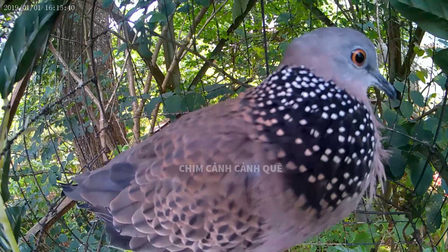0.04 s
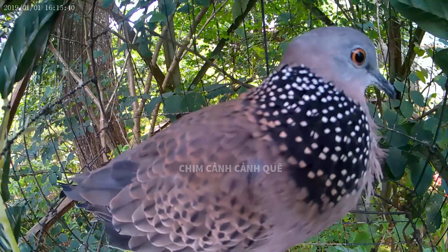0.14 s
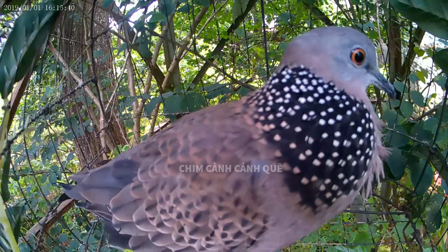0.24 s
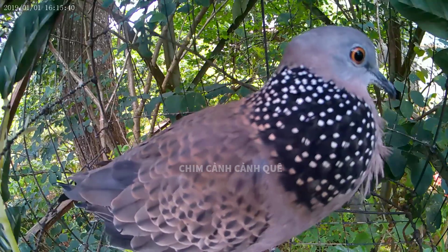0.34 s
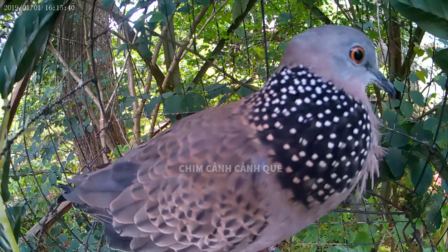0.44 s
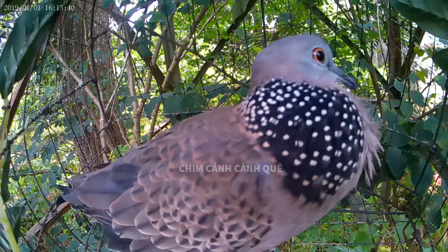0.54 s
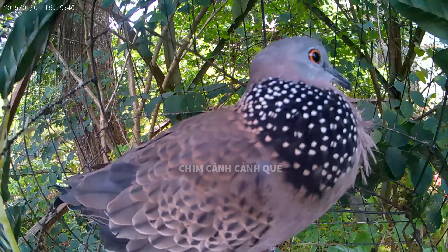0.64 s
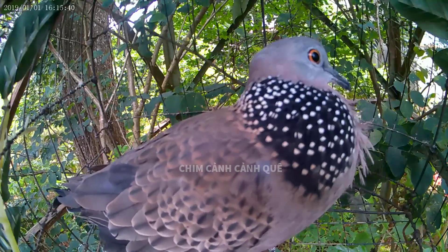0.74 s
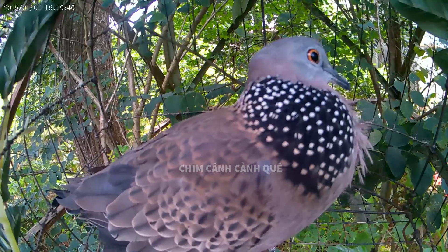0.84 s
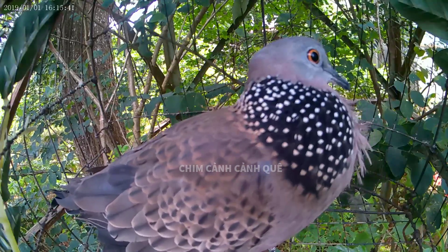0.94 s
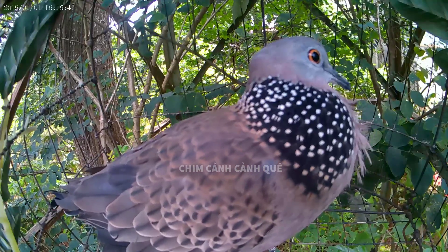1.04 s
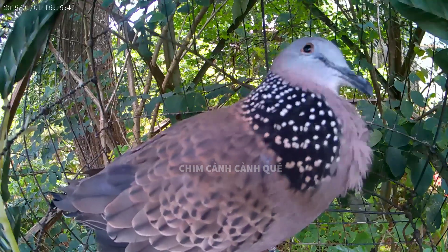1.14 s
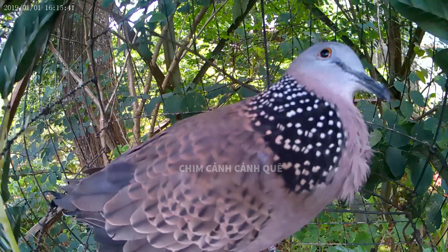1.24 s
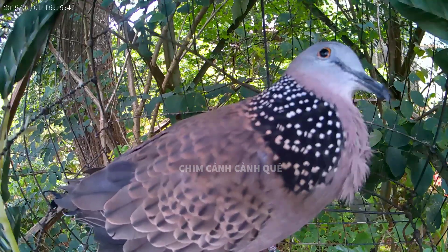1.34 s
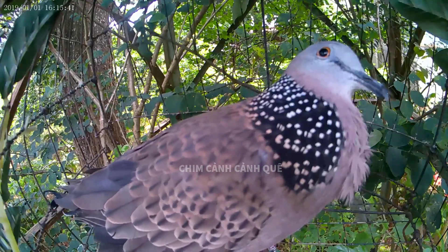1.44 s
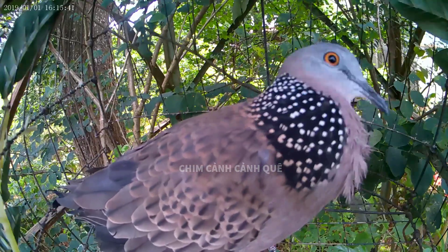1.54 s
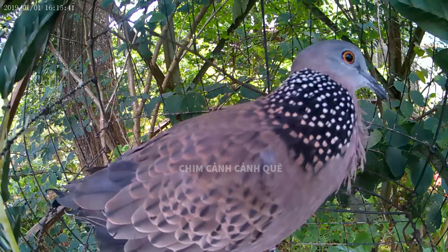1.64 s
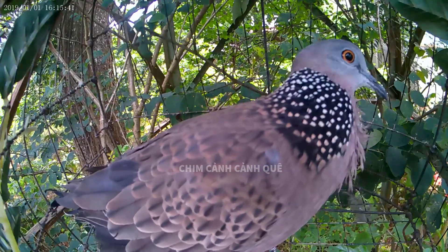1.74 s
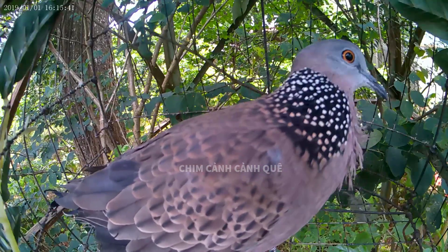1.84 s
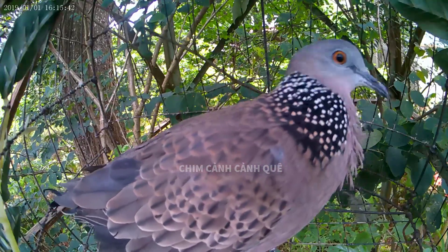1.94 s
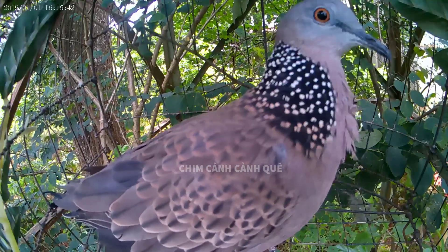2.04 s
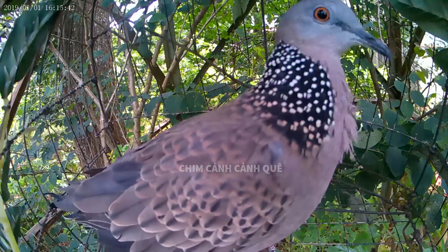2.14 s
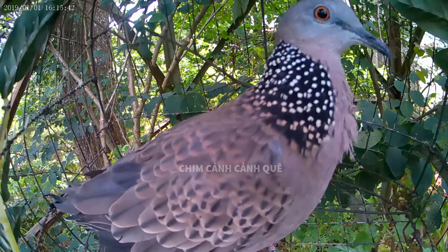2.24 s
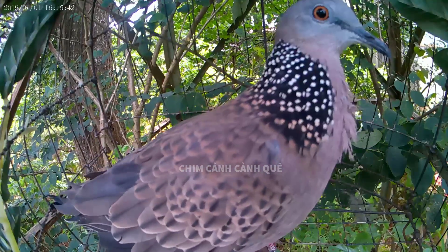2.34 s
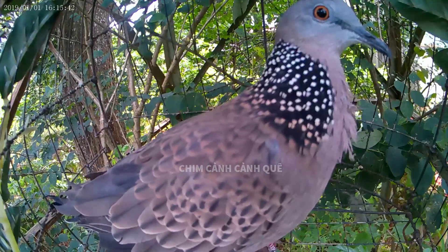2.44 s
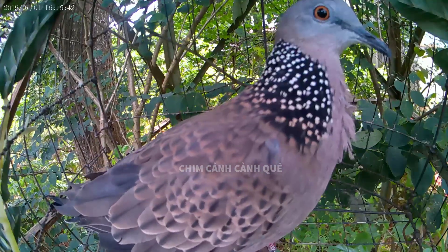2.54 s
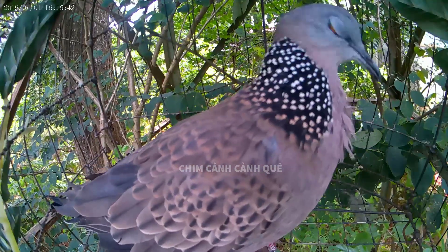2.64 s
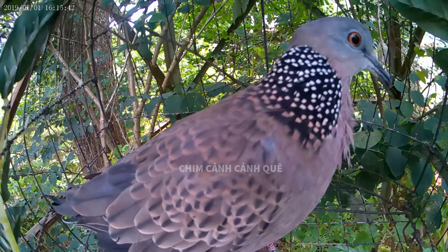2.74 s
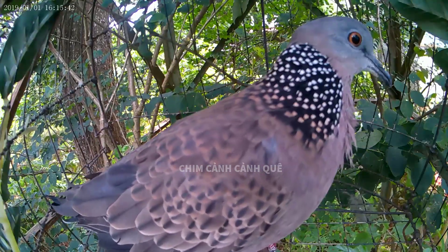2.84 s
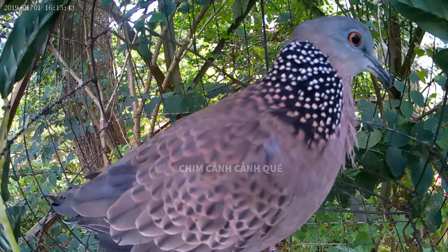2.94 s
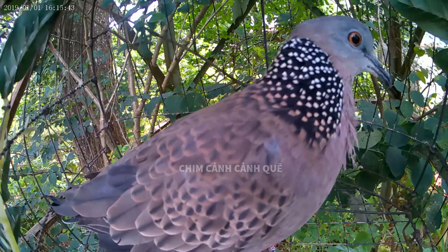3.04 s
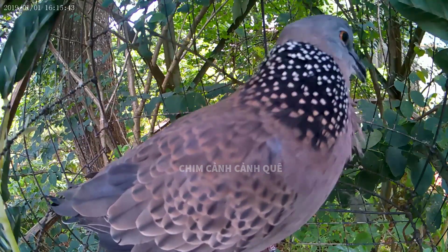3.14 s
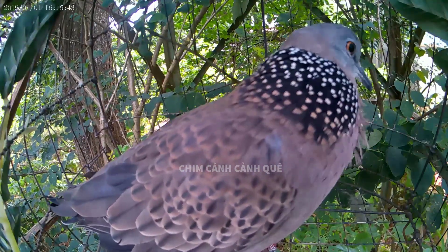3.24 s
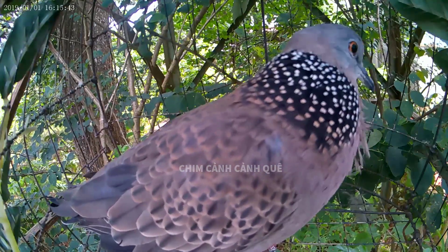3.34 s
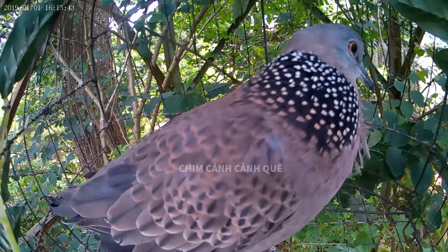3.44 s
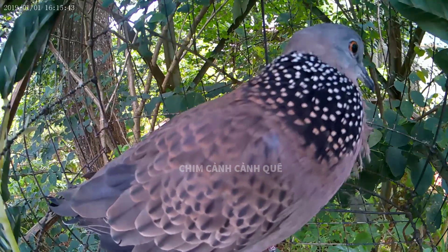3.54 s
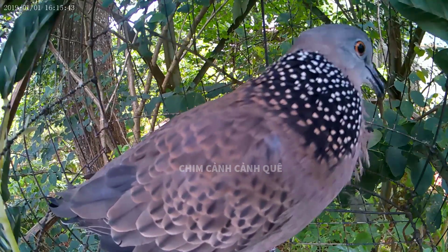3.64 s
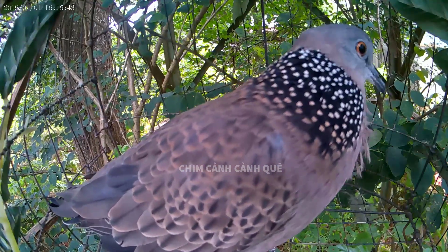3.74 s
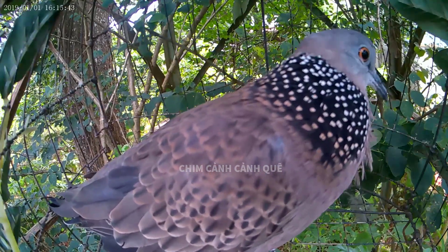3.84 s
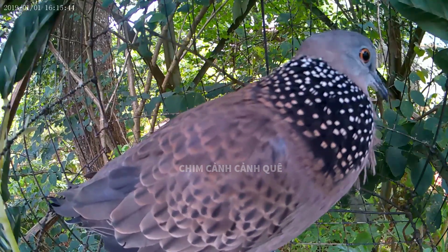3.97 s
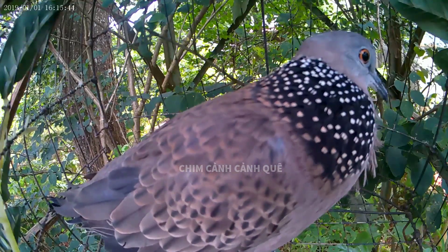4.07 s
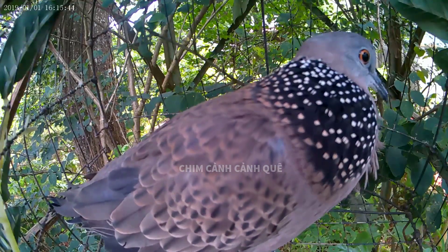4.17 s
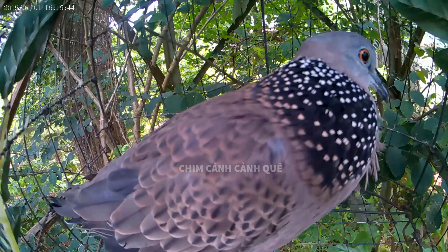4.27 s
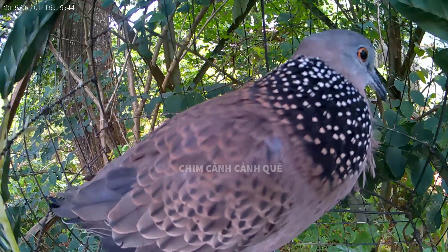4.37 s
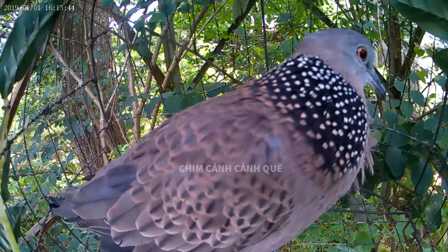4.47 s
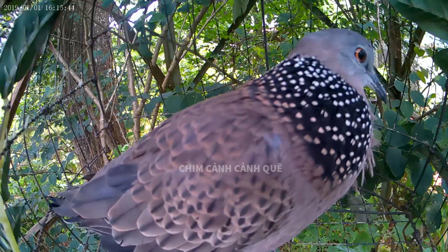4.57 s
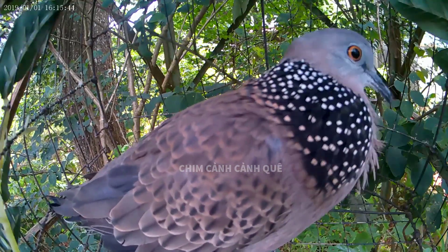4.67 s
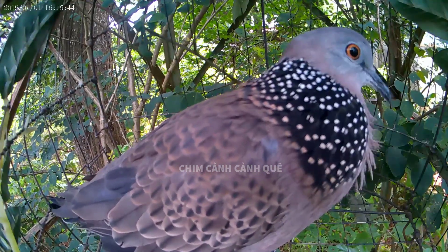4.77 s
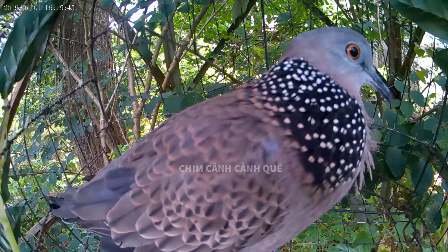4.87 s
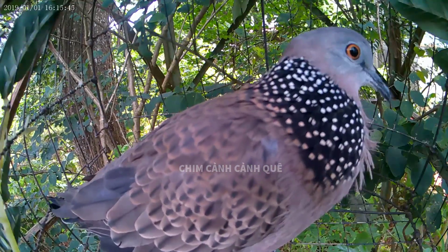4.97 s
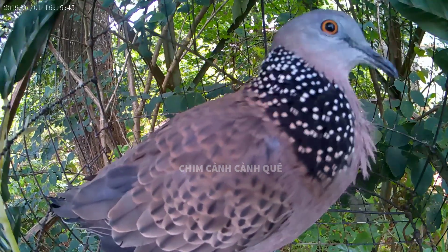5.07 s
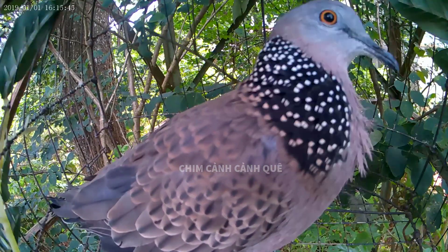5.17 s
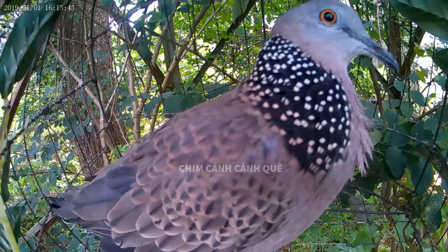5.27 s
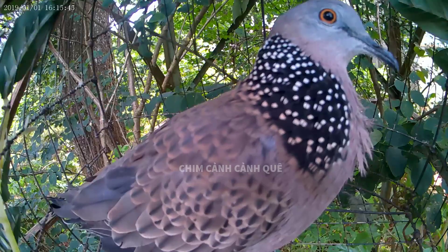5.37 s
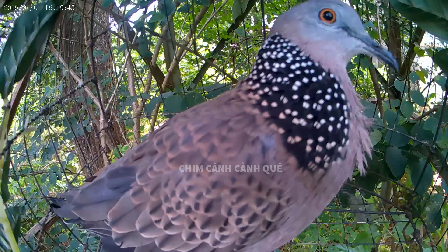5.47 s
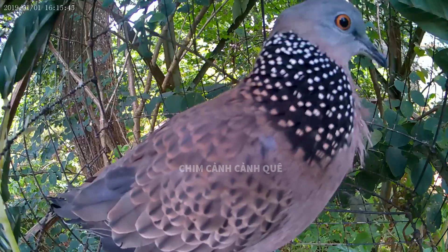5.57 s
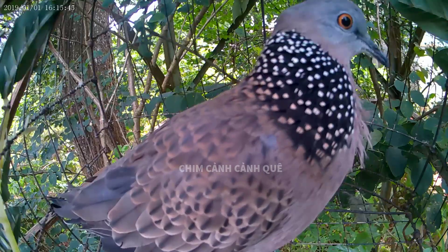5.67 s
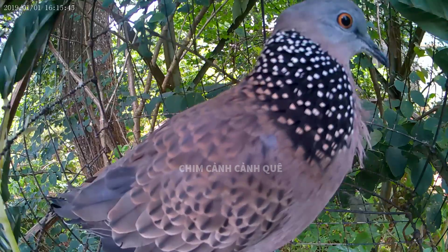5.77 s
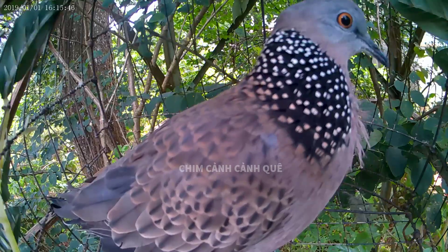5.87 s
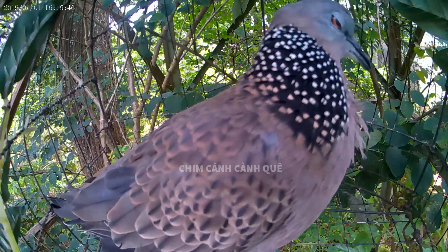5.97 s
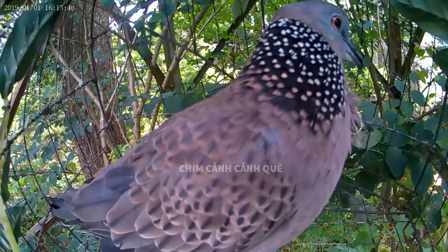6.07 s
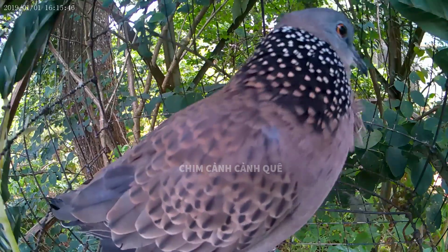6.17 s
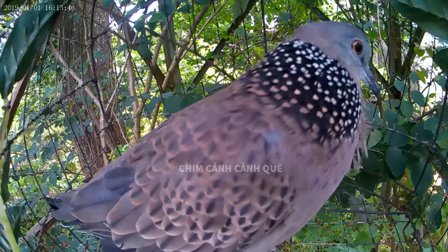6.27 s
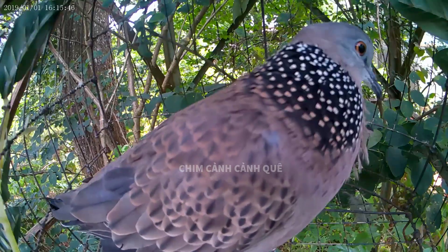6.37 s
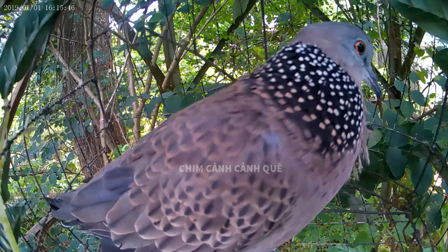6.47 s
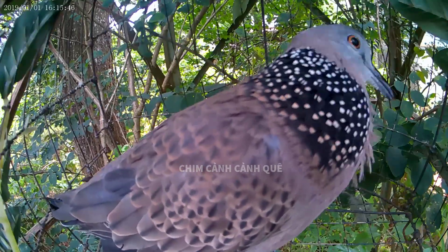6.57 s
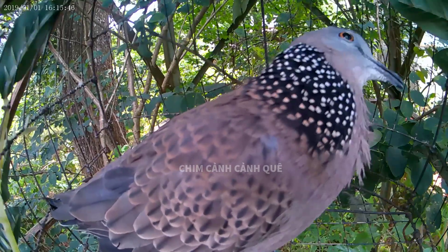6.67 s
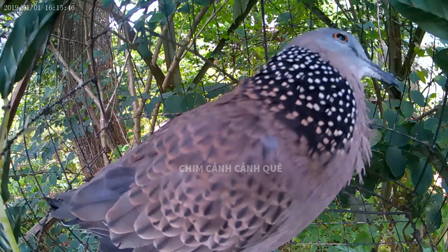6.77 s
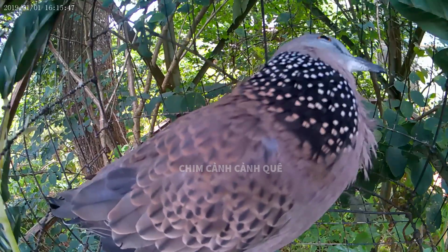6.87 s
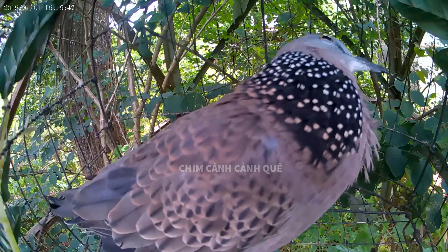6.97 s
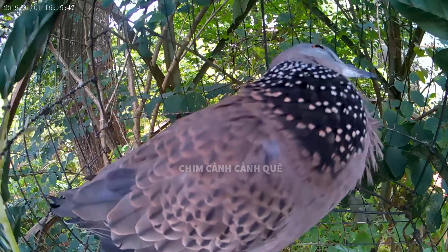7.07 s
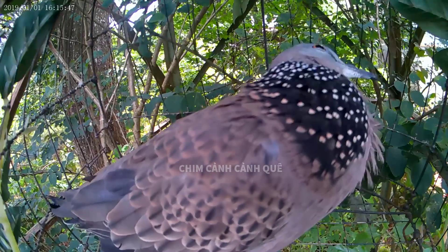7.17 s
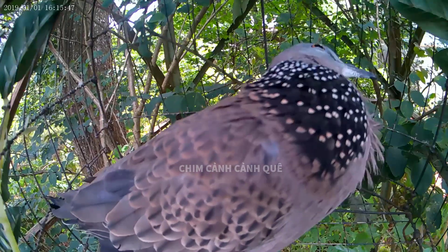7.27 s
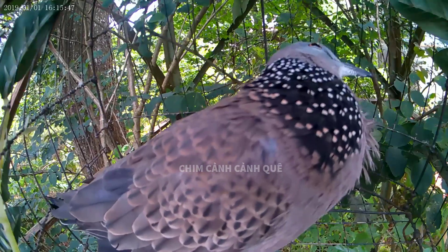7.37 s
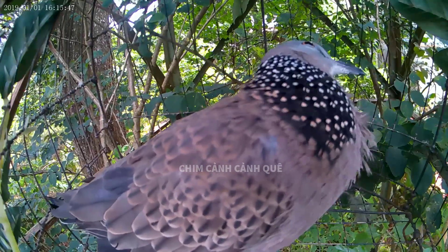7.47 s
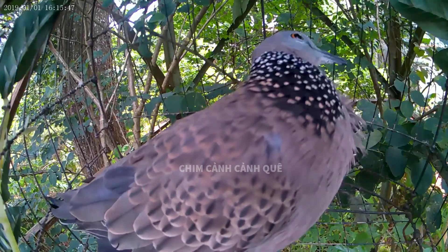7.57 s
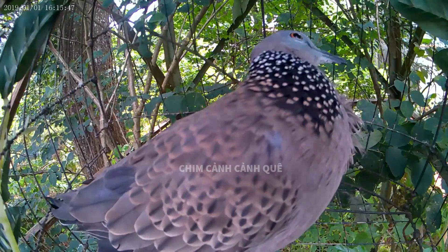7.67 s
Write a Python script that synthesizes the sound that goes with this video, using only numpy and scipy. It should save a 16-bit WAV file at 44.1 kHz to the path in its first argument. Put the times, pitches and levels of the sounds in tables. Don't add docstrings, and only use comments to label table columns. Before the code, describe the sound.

A dove perched right at a small microphone in a leafy outdoor pen. The tail of a coo dies at 0 s, then one full, hollow coo around 0.25-0.45 s breaks downward and stops. From 0.5 to 3.3 s only the background remains: low wind buffeting, thin leafy wash, faint insect-like hiss and a far engine droning. At 3.3 s a quick cluck with a faint catch opens a phrase; a short clipped coo at 3.6 s, then a rapid purring trill from 3.85 to 4.15 s that fuses into a sagging coo, ending near 4.35 s. A single coo follows at 4.6-4.8 s. In the pause, leaves stir, a faint engine whine rises and distant birds whistle around 5.4-6 s. The phrase repeats: cluck at 6.3 s, short coo at 6.55 s, trill from 6.8 s, sinking coo until 7.35 s, then quiet. The coos are near-pure, mid-low, around 700 Hz, loud and gritty with overload, with tiny close echoes.

```python
import sys
import numpy as np
from scipy import signal
from scipy.io import wavfile
from scipy.ndimage import uniform_filter1d

SR = 44100
rng = np.random.default_rng(int(sys.argv[2]) if len(sys.argv) > 2 else 0)


def to_wav(s):
    ch = np.atleast_2d(s).T
    pcm = np.round(np.clip(ch, -1, 1) * 32767)
    wavfile.write(sys.argv[1], SR, pcm.astype(np.int16))


def gain_from_db(level_db):
    decades = np.asarray(level_db, float) / 20
    return 10 ** decades


N = 340011

# start_s, hold_s, level_db, second_beat_db
CLUCKS = [
    (3.301, .021, -7.6, -20),
    (6.283, .0155, -7.3, -11),
]
# time_s, level_db, pitch_hz
HICCUP_SHAPE = [(0, -24, 700), (.011, 0, 700), (.021, -14, 670), (.045, -22, 620), (.058, -42, 620)]
SHORT_COO_SHAPE = [(0, -58, 720), (.015, -41, 700), (.024, -22, 630), (.033, -8.5, 665), (.049, -4, 705),
                   (.059, -4, 808), (.085, -4, 814), (.108, -5.5, 788), (.118, -5, 690)]
COO_SHAPE = [(0, -47, 555), (.017, -18, 572), (.024, -26, 610), (.034, -5, 675), (.047, -1.5, 690),
             (.056, -3.3, 765), (.1, -2.3, 752), (.128, -1.5, 725)]
SAG_SHAPE = [(0, -4.6, 668), (.024, -8.8, 646), (.05, -12.8, 614), (.09, -16.4, 588), (.124, -18, 580)]
# start_s, extra_hold_s, level_db, pitch_share
HICCUPS = [
    (3.406, .001, -33, 1.12),
    (6.395, .001, -23, .87),
]
SHORT_COOS = [
    (3.559, .001, .1, 1.005),
    (6.537, .005, -1.1, .985),
]
COOS = [
    (.243, .001, -.6, .995),
    (4.565, .016, -.2, 1.022),
]
SAGS = [
    (4.21, .007, -.1, 1.005),
    (7.19, -.003, -.3, .995),
]
# time_s, level_db, pitch_hz
TRILL_JOINS = [
    [(4.141, -20.5, 717), (4.146, -6.5, 683), (4.157, -.1, 696), (4.16, -13, 638), (4.164, -6, 683),
     (4.175, -2.1, 712), (4.19, -3, 684)],
    [(7.103, -30, 611), (7.109, -4, 700), (7.122, -2.5, 675), (7.131, -2.1, 758), (7.137, -1.1, 682),
     (7.148, -2.1, 768), (7.172, -.6, 735), (7.181, -7.5, 705)],
]
# time_s, level_db, pitch_hz
LEFTOVER = [(0, -18.5, 560), (.008, -19.5, 570)]
# delay_s, level_db, pitch_share
SNAP_ENDING = [(.003, -15, 1.04), (.014, -31, 1.01)]
BREAK_ENDING = [(.005, -6, .97), (.012, -.5, .94), (.034, -6.5, .875), (.05, -13, .83), (.061, -22.5, .73),
                (.08, -52, .62)]
DIP_ENDING = [(.01, -6, .88), (.018, -15, .76), (.024, -30, .69), (.03, -48, .67)]
TRILLS = [
    [3.8417, 3.8697, 3.89, 3.9117, 3.9347, 3.9576, 3.9794, 4.0023, 4.0228, 4.0432, 4.0655, 4.0859, 4.1066,
     4.1268],
    [6.8263, 6.8524, 6.8713, 6.8938, 6.9157, 6.9367, 6.9604, 6.9822, 7.0036, 7.0268, 7.0473, 7.0672, 7.0875],
]
# start_s, level_db, centre_hz, t60_s
FLUTTER = [(3.336, -29, 680, .17), (6.321, -28.5, 740, .15), (3.412, -44, 760, .16), (6.412, -38, 700, .15),
           (3.688, -40, 760, .11), (6.668, -39, 740, .12), (4.356, -45, 760, .08), (7.328, -49, 740, .08),
           (4.778, -50, 720, .09)]
# middle_s, length_s, level_db
GUSTS = [(.07, .2, -58), (.3, .3, -58), (.68, .25, -64), (1.38, .45, -59), (1.85, .5, -61), (2.35, .6, -57),
         (2.85, .6, -55), (3.35, .5, -59), (4.05, .6, -64), (4.6, .45, -55), (5.1, .35, -56),
         (5.75, .5, -56), (6.1, .5, -58), (6.27, .25, -56), (6.95, .6, -59), (7.57, .4, -66)]
# frequency_hz, density_db
RUMBLE_SPECTRUM = [(8.8, -24.5), (15, 4), (102, -8.5), (138, -14), (222, -35), (265, -20), (300, -41.5),
                   (390, -76)]
# frequency_hz, density_db
WASH_SPECTRUM = [(60, -12.5), (350, -17.5), (700, -12), (1200, -11), (1500, -16), (2200, -26), (3000, -45),
                 (15000, -70)]
# frequency_hz, density_db
HISS_SPECTRUM = [(1180, -32.5), (2000, -2.5), (3180, -5), (5360, -6), (6680, -11), (10600, -13),
                 (11600, -24), (15000, -30.5)]
# time_s, level_db
LEAVES = [(0, -77), (3.25, -76), (3.75, -88), (4.9, -84), (5.35, -81), (5.68, -74), (6.25, -70),
          (6.75, -80), (7.71, -78)]
# time_s, level_db
INSECTS = [(0, -88), (1, -84), (3.2, -81.5), (3.7, -105)]
# time_s, level_db, firing_hz
ENGINE = [(0, -63, 68.4), (.5, -64.5, 67.5), (1, -59.5, 68.07), (1.6, -62.5, 67.85), (2.2, -63, 66.64),
          (3.3, -65, 64.9), (3.6, -73.5, 65.4), (5.6, -80, 65.6), (5.9, -68, 66.26), (6.2, -81, 66.44),
          (7.71, -83.5, 65.67)]
# multiple_of_firing_rate, level_db
ENGINE_ORDERS = [(2, -1), (3, -4.5), (4, -7.5), (5, -15), (6, -15.5), (7, -6), (8, -4), (10, -17),
                 (20.5, -18)]
# time_s, level_db, pitch_hz
WHINE = [(4.801, -80.5, 523), (5.1, -73, 522), (5.299, -86, 520), (5.6, -67, 520), (5.82, -80, 520)]
# start_s, length_s, start_hz, end_hz, level_db
FAR_WHISTLES = [(5.35, .21, 2640, 2520, -74), (5.43, .13, 3020, 2930, -77), (5.41, .07, 3470, 3440, -82),
                (5.44, .17, 2380, 2270, -73), (5.55, .17, 2500, 2450, -74), (5.56, .08, 3130, 3100, -79),
                (5.6, .1, 2330, 2300, -72), (5.62, .09, 2050, 2080, -73), (5.6, .08, 1040, 1100, -68),
                (5.6, .1, 2900, 2880, -79), (5.8, .2, 2150, 2080, -75), (5.88, .06, 3200, 3150, -83),
                (5.77, .06, 1930, 1910, -80), (5.5, .12, 2780, 2700, -81)]
# frequency_hz, gain_db
MIC_RESPONSE = [(30, 0.5), (700, -2), (2200, -3), (4000, -3), (7000, -3.5), (10800, -6.5), (11300, -12),
                (16000, -11.5)]
# frequency_hz, level_under_sound_db
GRIT = [(30, -26.5), (300, -25), (1000, -24.5), (1600, -23.5), (2600, -17), (4500, -10.5), (8000, -7),
        (15000, -5)]
# frequency_hz, level_under_whole_sound_db
SKIRT = [(1000, -70), (2000, -62), (3000, -68), (6000, -80.5), (15000, -90)]
# start_s, length_s, level_db
FLAT_LINES = [(0.257, 0.032, -52.5), (0.407, 0.027, -56.5), (3.319, 0.032, -48), (3.569, .028, -44.5),
              (3.664, 0.043, -45.5), (4.569, 0.046, -43), (4.736, 0.037, -56), (6.289, 0.039, -41),
              (6.655, 0.024, -50), (4.235, .025, -58)]


def dove():
    out = np.zeros(N)
    add(out, *held(LEFTOVER, DIP_ENDING))
    for note in CLUCKS:
        add(out, *held(cluck(*note), []))
    kinds = [(HICCUP_SHAPE, [], HICCUPS),
             (SHORT_COO_SHAPE, SNAP_ENDING, SHORT_COOS),
             (COO_SHAPE, BREAK_ENDING, COOS)]
    for shape, ending, notes in kinds:
        for note in notes:
            add(out, *held(placed(shape, *note), ending))
    for join, sag in zip(TRILL_JOINS, SAGS):
        add(out, *held(join + placed(SAG_SHAPE, *sag), DIP_ENDING))
    for starts in TRILLS:
        for start, *shape in puffs(starts):
            add(out, *puff(start, *shape))
    for start, *shape in FLUTTER:
        add(out, start, flutter(*shape))
    return out


def tone(hz):
    wobble = 1 + .006 * drift(len(hz), 450)
    phase = 2 * np.pi * (np.cumsum(hz * wobble) / SR + rng.random())
    second_db = np.maximum(-35 - .12 * (hz - 599), -46)
    return np.sin(phase) + gain_from_db(second_db) * np.sin(2 * phase)


def held(rows, ending):
    last_s, last_db, last_hz = rows[-1]
    tail = [(last_s + delay, last_db + db, last_hz * share) for delay, db, share in ending]
    s, db, hz = np.transpose([*rows, *tail])
    t = np.arange(s[0], s[-1], 1 / SR)
    ends = np.clip(np.minimum(t - t[0] + 1e-4, t[-1] - t) / .002, 0, 1)
    level = uniform_filter1d(gain_from_db(np.interp(t, s, db)), size=70)
    return s[0], ends * level * tone(np.interp(t, s, hz))


def placed(shape, start, extra, db, share):
    attack_s = .06
    s, shape_db, hz = np.transpose(shape)
    stretch = np.maximum(s - attack_s, 0) / max(s[-1] - attack_s, .01)
    return list(zip(start + s + extra * stretch, shape_db + db, hz * share))


def cluck(start, hold, db, beat_db):
    low_hz, high_hz, beat_hz = 640, 735, 630
    top = start + .0085
    end = top + hold
    return [(start, db - 33, low_hz), (top, db - 1.2, low_hz), (end, db, high_hz),
            (end + .003, beat_db - 6, beat_hz), (end + .007, beat_db, beat_hz),
            (end + .016, beat_db - 21, beat_hz)]


def puffs(starts):
    # length_s, start_hz, end_hz, level_db
    first, second = (.0153, 685, 718, -5.5), (.009, 715, 810, -3.5)
    third, last = np.array([(.012, 712, 834, -3.4), (.0132, 690, 762, -1.8)])
    blend = np.linspace(0, 1, len(starts) - 2)[:, None] ** 1.6
    rest = (1 - blend) * third + blend * last
    return np.column_stack([starts, np.vstack([first, second, rest])])


def puff(start, length, start_hz, end_hz, db):
    rise_db_per_s, fall_s, rebound_s = 4200, .0031, .0055
    t = np.arange(-.009, length + fall_s + rebound_s, 1 / SR)
    shut = length + 0.49 * fall_s
    swell = gain_from_db(db - rise_db_per_s * np.maximum(.003 - t, 0)) * np.clip((shut - t) / fall_s, 0, 1)
    rebound = .055 * (.5 + rng.random())
    bounce = rebound * np.sin(np.pi * np.clip((t - shut) / rebound_s, 0, 1))
    slide = np.sin(np.clip((t - .002) / (length - .005), -.4, 1.5) * 1.55)
    return start + t[0], (swell - bounce) * tone(start_hz + (end_hz - start_hz) * slide)


def flutter(db, hz, t60):
    t = np.arange(0, .13, 1 / SR)
    rattle = rng.standard_normal(len(t))
    for _ in range(4):
        rattle = evened(resonate(rattle, hz, 380))
    return gain_from_db(db - 60 * t / t60) * np.minimum(t / 0.0052, 1) * rattle


def pen(x):
    t60_s = .08
    taps = np.zeros(8000)
    slots = np.arange(100, 7900, 22)
    at = slots + rng.integers(0, 22, len(slots))
    taps[at] = rng.choice([-1., 1.], len(at)) * gain_from_db(-60 * at / SR / t60_s)
    return signal.oaconvolve(x, taps / np.linalg.norm(taps))[:N]


def air():
    t, coarse = np.arange(N) / SR, np.arange(0, N / SR + .02, .01)
    calm_db, leaf_hiss_db, circuit_db = -66, -17, -94
    gusts = 0
    for middle, length, db in GUSTS:
        gusts = gusts + gain_from_db(db) * np.cos(np.pi * np.clip((coarse - middle) / length, -.5, .5)) ** 2
    wind = np.interp(t, coarse, np.hypot(gain_from_db(calm_db), gusts))
    rumble = wind * gain_from_db(1.5 * drift(N, 29)) * hiss(RUMBLE_SPECTRUM, patchy_db=1.1)
    leaves = gain_from_db(np.interp(coarse, *np.transpose(LEAVES)))
    insects = gain_from_db(np.interp(coarse, *np.transpose(INSECTS)))
    wash = np.interp(t, coarse, leaves) * gain_from_db(5.5) * hiss(WASH_SPECTRUM, patchy_db=2.5)
    fine = np.sqrt(insects ** 2 + (leaves * gain_from_db(leaf_hiss_db)) ** 2 + gain_from_db(circuit_db) ** 2)
    return rumble + wash + np.interp(t, coarse, fine) * hiss(HISS_SPECTRUM, patchy_db=1.1)


def engine():
    s, db, hz = np.transpose(ENGINE)
    t = np.arange(N) / SR
    firing_hz = np.interp(t, s, hz) * (1 + 0.0027 * drift(N, 6))
    phase = 2 * np.pi * np.cumsum(firing_hz) / SR
    orders = np.zeros(N)
    for k, order_db in ENGINE_ORDERS:
        orders += gain_from_db(order_db + 3.5 * drift(N, 9)) * np.sin(k * phase + k * k)
    pipe_hz, pipe_width_hz, roar_db = 500, 150, -3.5
    roar = resonate(rng.standard_normal(N), pipe_hz, pipe_width_hz)
    roar = evened(resonate(roar, pipe_hz, pipe_width_hz))
    out = gain_from_db(np.interp(t, s, db)) * (evened(orders) + gain_from_db(roar_db) * roar)
    s, db, hz = np.transpose(WHINE)
    whine = np.sin(2 * np.pi * np.cumsum(np.interp(t, s, hz)) / SR)
    return out + gain_from_db(np.interp(t, s, db, -140, -140)) * whine


def far_birds():
    out = np.zeros(N)
    for s, length, start_hz, end_hz, db in FAR_WHISTLES:
        hz = np.linspace(start_hz, end_hz, round(length * SR))
        whistle = resonate(rng.standard_normal(len(hz)), hz, 75)
        whistle = evened(resonate(whistle, hz, 75))
        add(out, s, gain_from_db(db + 2.5) * whistle * np.hanning(len(hz)) ** 0.41)
    return out


def hiss(points, patchy_db):
    frames, hz = N // 512 + 5, np.fft.rfftfreq(2048, 1 / SR)
    a, b, patches = rng.standard_normal((frames, 1025, 3)).T
    patches = evened(uniform_filter1d(uniform_filter1d(patches, 10, 0), 6, 1))
    z = (a + 1j * b) * gain_from_db(read(points, hz)[:, None] + patchy_db * patches)
    return evened(signal.istft(z, nperseg=2048, noverlap=1536)[1][:N])


def resonate(x, hz, width):
    turn = np.exp(2j * np.pi * np.cumsum(hz * np.ones(len(x))) / SR)
    r = np.exp(-np.pi * width / SR)
    return 2 * (turn * signal.lfilter([1 - r], [1, -r], x * turn.conj())).real


def drift(size, hz):
    span = int(SR / hz)
    return evened(uniform_filter1d(uniform_filter1d(rng.standard_normal(size), span), span))


def evened(x):
    return x / np.sqrt(np.mean(x ** 2) + 1e-20)


def read(points, hz):
    f, value = np.transpose(points)
    return np.interp(np.log(hz + 1), np.log(f + 1), value)


def add(mix, s, sound):
    part = mix[max(round(s * SR), 0):][:len(sound)]
    part += sound[:len(part)]


def scene():
    bird = dove()
    return (bird + gain_from_db(-27) * pen(bird) + air() + engine() + far_birds())[None]


def low_pass(x):
    return signal.sosfilt(signal.butter(12, 15790, fs=SR, output="sos"), x)


def record(dry):
    ceiling, makeup_db, limit_db = .37, 1.5, -9.6
    squared = gain_from_db(makeup_db) * np.clip(dry[0], -ceiling, ceiling)
    rms = np.sqrt(abs(uniform_filter1d(uniform_filter1d(squared ** 2, size=60), size=60)))
    excess = np.maximum(rms / gain_from_db(limit_db + .5 * drift(N, 70)), 1)
    hz, t, z = signal.stft(squared / excess, SR, nperseg=512, noverlap=384)
    z = z * gain_from_db(read(MIC_RESPONSE, hz))[:, None]
    power = abs(z) ** 2
    total = power.sum(0)
    near = uniform_filter1d(uniform_filter1d(power, size=13, axis=0), size=11, axis=0)
    loud = (total / total.max()) ** .6
    grit = abs(near) * loud * gain_from_db(2 * read(GRIT, hz))[:, None]
    skirt = total * gain_from_db(2 * read(SKIRT, hz))[:, None]
    a, b = rng.standard_normal((len(t), len(hz), 2)).T
    z = z + (a + 1j * b) * np.sqrt(grit + skirt)
    gritty = signal.istft(z, SR, nperseg=512, noverlap=384)[1][:N]
    for s, length, db in FLAT_LINES:
        t = np.arange(0, length, 1 / SR)
        line = np.sin(2 * np.pi * 2090 * t)
        add(gritty, s, gain_from_db(db) * signal.windows.tukey(len(t), .7) * line)
    return low_pass(gritty[None])


dry = scene()
out = record(dry)
to_wav(out)
```